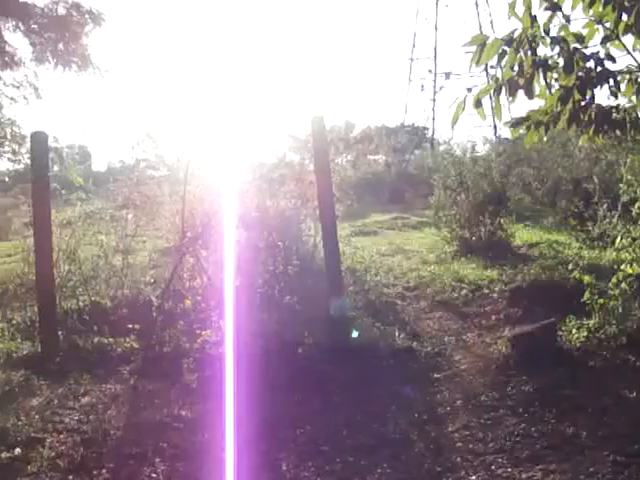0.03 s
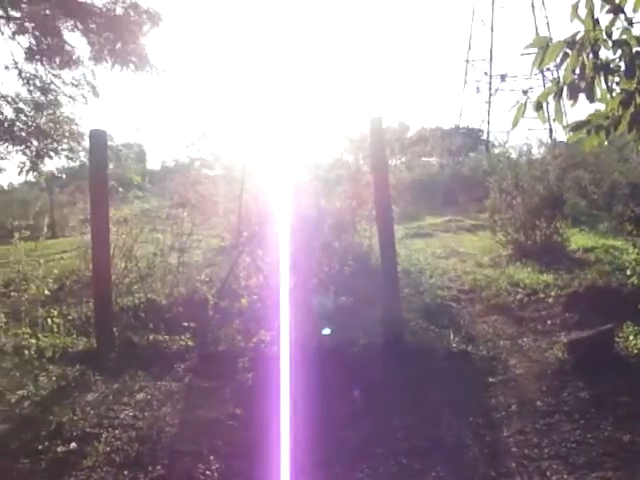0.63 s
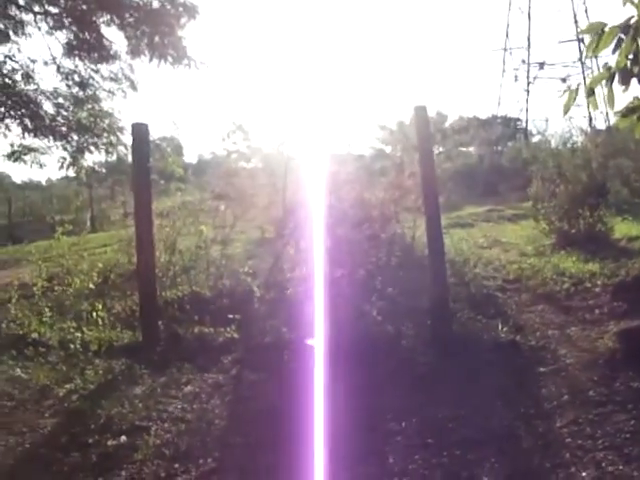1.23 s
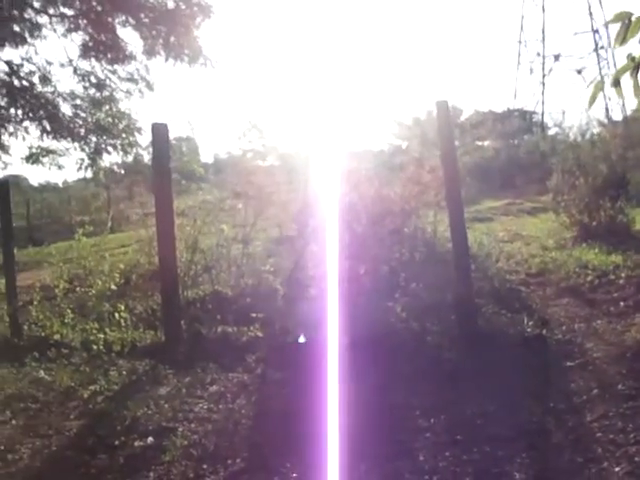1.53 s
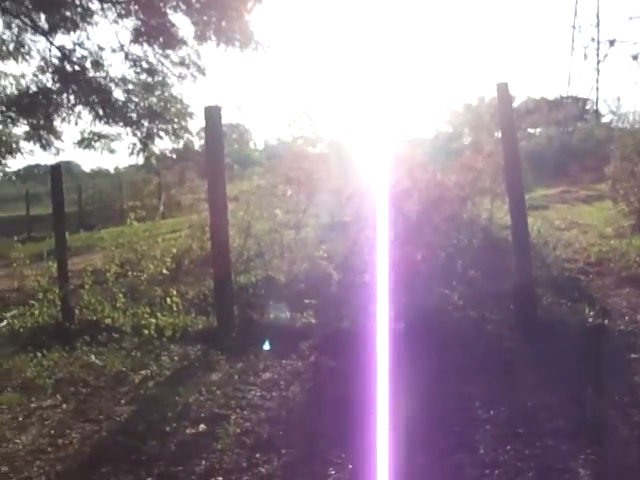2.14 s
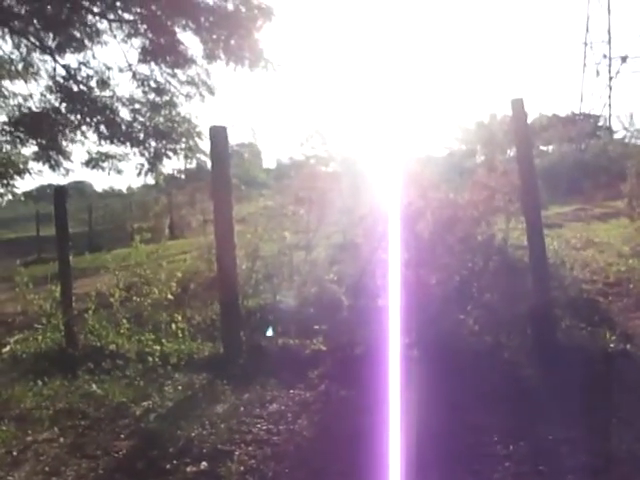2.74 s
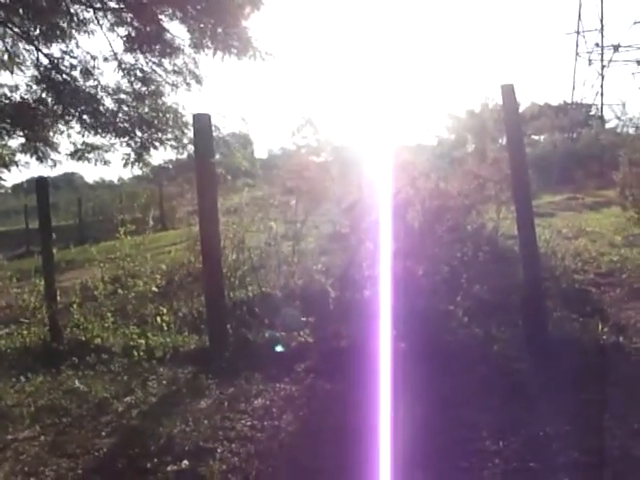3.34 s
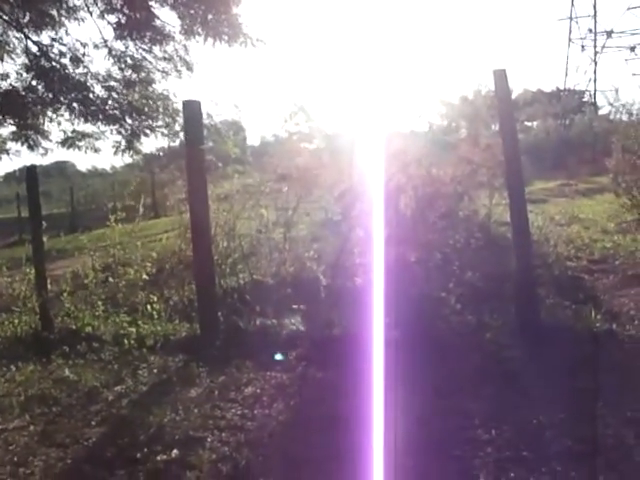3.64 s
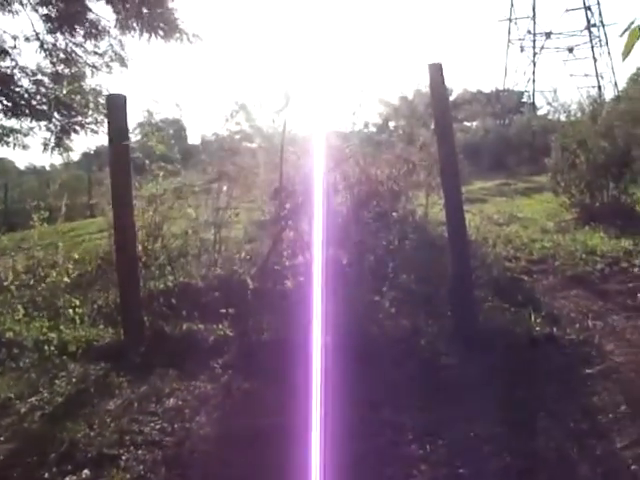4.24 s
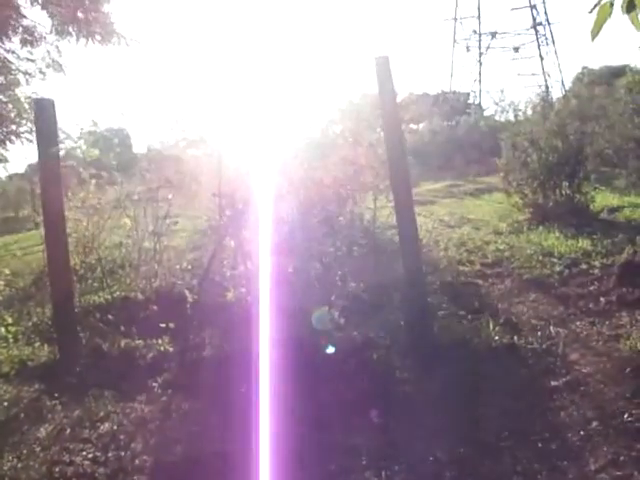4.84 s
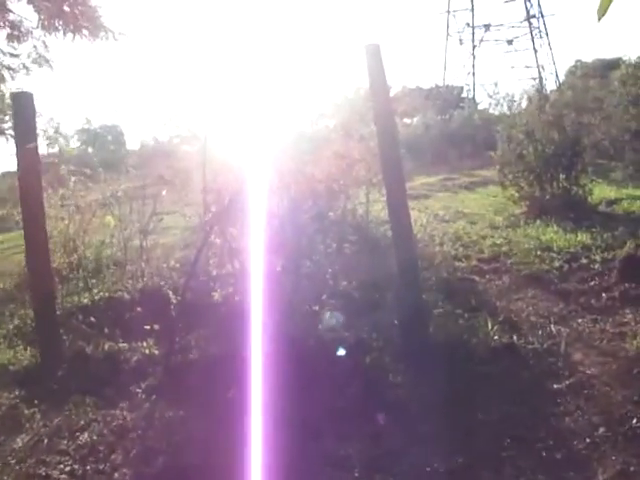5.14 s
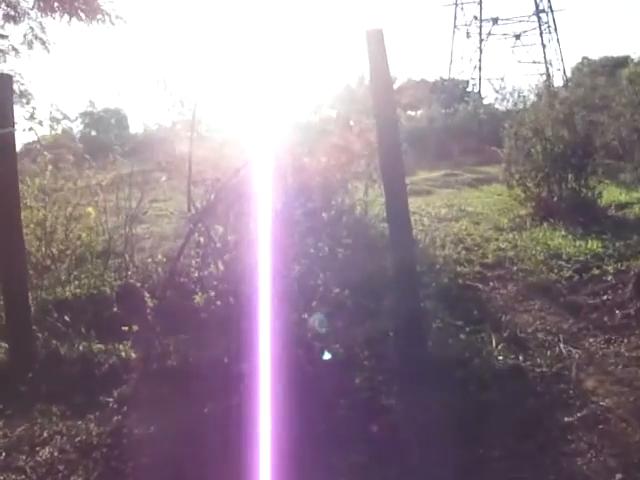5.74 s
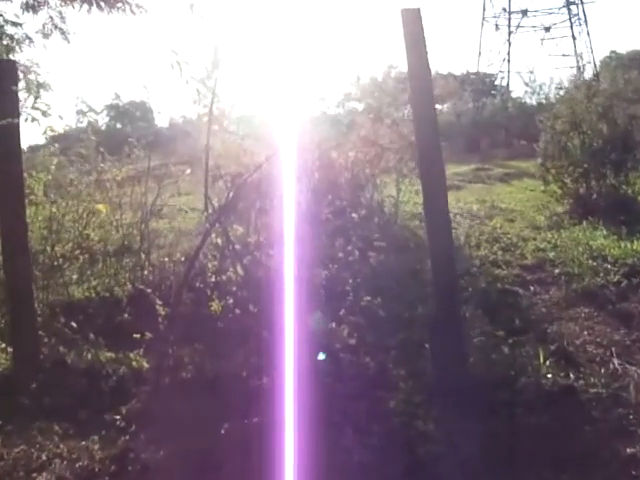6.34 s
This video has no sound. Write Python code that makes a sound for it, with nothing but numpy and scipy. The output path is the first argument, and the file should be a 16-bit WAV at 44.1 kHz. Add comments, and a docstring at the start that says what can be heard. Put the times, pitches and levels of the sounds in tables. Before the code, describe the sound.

A nearby calf lets out a short, raspy moo and, after a pause, a long one that drops in pitch at the end. The hand-held camera ticks twice along the way. A single soft bird whistle follows, then light rubbing, clicks and dull knocks right at the microphone and a few quick high chirps. Behind it all is the gentle hush of an open field with faraway birds.

```python
"""A soft outdoor hush and faint, distant twittering lie under an open pasture. Right away a calf bawls
close by, once short, then once long: slow, sharp pulses of its vocal folds ring its throat, and the bushes
throw back a short echo. A hand-held camera ticks twice along the way. As the long bawl dies, a bird gives
one arching whistle. Then fingers rub, click and bump on the camera's case, with a few quick chirps among
the last knocks."""
import sys
import numpy as np
from scipy import signal
from scipy.fft import rfft, irfft, next_fast_len
from scipy.io import wavfile
from scipy.ndimage import uniform_filter1d, map_coordinates

SR = 44100
rng = np.random.default_rng(int(sys.argv[2]) if len(sys.argv) > 2 else 0)


def wrap_up_sound(samples):
    """Save the sound to the file named by the first command line argument, as 16-bit audio."""
    columns = np.atleast_2d(samples).T
    # keep every value between -1 and 1, then stretch to whole-number steps
    tamed = np.clip(columns, -1, 1)
    steps = np.round(tamed * 32767).astype(np.int16)
    wavfile.write(sys.argv[1], SR, steps)


N = 290178

# Colour of the background hush. Each row: frequency in Hz, relative level in dB.
BACKGROUND_COLOUR = [(15, -65), (25, -35), (37, -27), (54, -8), (134, -6.5), (201, -6.5), (335, -7.5),
                     (411, -5.5), (587, -2), (757, 0), (817, -4.5), (1140, -3), (1890, -10.5), (2920, -15),
                     (11000, -29.5), (14200, -69), (22000, -120)]
# The background hush grows slightly louder after the long bawl.
# Each row: time in seconds, relative level in dB.
BACKGROUND_RISE = [(3.6, -48), (4.15, -46.5)]
# The two bawls. Each row: start, end and attack in seconds, blare and rasp levels in dB, blare and rasp
# sag in dB per second, release and pitch droop times in seconds, softness of the start from 0 to 1.
BAWLS = [(0.0609, 0.651, 0.00067, -20, -37.5, 5, 9.5, 0.036, .035, 0.04),
         (1.247, 3.23, 0.016, -21, -41, 0.77, 1.7, 0.02, .05, 1)]
# Held pitch of the short and the long bawl. Each row: time in seconds, pitch in Hz.
PITCH_SHORT = [(0.06, 125), (0.31, 120.5), (0.402, 118), (0.434, 116.8), (0.53, 116.5)]
PITCH_LONG = [(1.29, 106.5), (1.4, 106.7), (1.512, 109.6), (1.76, 113.2), (1.812, 111.2), (1.904, 113.4),
              (1.986, 112.5), (2.012, 113.9), (2.316, 118.4), (2.68, 117.1), (2.946, 115), (3.03, 113.5)]
# How unevenly the folds beat in mid-bawl. One value for each bawl, where 0 is clean.
HOARSE_HELD = [.24, .15]
# The calf's mouth. Each row: time in seconds, opening from 0 to 1.
MOUTH_OPENING = [(.05, 0.69), (.45, 0.67), (.64, 0.2), (1.25, 0), (2.38, 1), (3.22, 0.75)]
# Throat resonances of the short and the long bawl. Each row: nominal centre and width in Hz,
# relative level in dB with the mouth narrow, then with it wide.
THROAT_SHORT = [(708, 99, 0.5, -11), (1120, 1070, -18, -16), (1565, 220, -36, -6.5), (1695, 59, -1.5, 1.5),
                (2178, 174, 0.5, 4.5), (2555, 340, -10.5, 1), (2790, 130, -2.5, -7.5),
                (3520, 460, -11, -16.5), (4230, 190, -30, -12), (4950, 480, -13, -12.5),
                (5670, 190, -9.5, -35), (6220, 470, -18.5, -35), (9370, 1150, -34.5, -34.5)]
THROAT_LONG = [(692, 78, -2, 10), (1050, 260, -11, -19.5), (1600, 180, -70, -32), (1769, 214, -11, -8),
               (2015, 120, -49, -10.5), (2228, 275, 3, 1), (2580, 120, -9, -8.5), (2955, 158, -6, -10.5),
               (3400, 390, -9, -14.5), (4435, 400, -22, -17.5), (4810, 360, -46, -18.5),
               (5180, 108, -21, -16), (5720, 560, -32.5, -22.5), (6220, 290, -30, -21.5),
               (5300, 1000, -35, -53), (8740, 700, -59, -38), (9880, 730, -47, -35)]
# Fader ride on the voice's low boom. Each row: time in seconds, level in dB before the throb.
BOOM_RIDE = [(.06, -38), (.48, -37.5), (.57, -31.5), (.65, -42), (1.25, -42.5), (1.62, -30.5), (2.0, -33),
             (2.36, -30), (2.72, -25.5), (3.03, -28.5), (3.23, -34)]
# Colour of the calf's echo in the bushes. Each row: frequency in Hz, gain in dB.
ECHO_COLOUR = [(300, -14), (700, 0.5), (1700, 13), (2250, 2.5), (3000, 5), (6000, 11.5), (10000, 14)]
# Sharp ticks of the camera's case.
# Each row: start in seconds, relative peak in dB, ring pitch in Hz, crispness in dB.
CASE_TICKS = [(0.2252, -19, 5600, -16.5), (1.202, -23, 6750, -35), (4.18, -42, 7800, -18),
              (4.3017, -36.5, 7550, -25), (4.5835, -34.5, 6360, -9), (4.7122, -41, 6350, -23),
              (5.1902, -20, 8300, -14), (5.256, -37, 10100, -12), (5.2816, -37, 8140, -19),
              (5.3073, -37, 6500, -14), (6.127, -38.5, 8370, -16), (6.346, -40, 6670, -24)]
# Duller bumps of the hand. Each row: start in seconds, relative peak in dB, ring pitch in Hz.
HAND_BUMPS = [(5.186, -18, 1280), (5.202, -25, 1160), (5.37, -32, 775), (5.561, -22.5, 1094),
              (6.284, -27.5, 1100), (6.527, -25.5, 1224)]
# Modes of the bumped case.
# Each row: ratio to the ring pitch, relative level in dB, time to fall 60 dB in cycles of the ring pitch.
CASE_MODES = [(1.02, 11.5, 16.3), (1.45, 12.5, 9.2), (2.08, 1.5, 27.6), (0.79, 2, 20)]
# Fingers rubbing the case. Each row: centre and half length in seconds, level in dB.
FINGER_RUBS = [(4.18, .03, -48), (4.277, 0.063, -64), (5.118, .025, -52.5), (5.265, 0.061, -53),
               (6.126, 0.018, -54.5), (6.483, 0.028, -63)]
# Notes of the nearer birds. Each row: start and length in seconds, first, middle and last pitch in Hz,
# level at the accent in dB, place of the accent from 0 to 1, buzz depth in Hz.
BIRD_NOTES = [(3.205, .373, 4022, 4570, 3560, -46, .78, 8), (5.434, .07, 2070, 2850, 2820, -52, 0.33, 8),
              (5.606, .046, 6270, 5750, 4860, -44, 0.6, 8),
              (5.649, 0.066, 5000, 5160, 5600, -47.5, 0.2, 470),
              (5.819, 0.023, 5100, 5770, 5500, -47, 0.95, 8), (5.893, .011, 6300, 5750, 5200, -54, .6, 8),
              (5.913, 0.012, 6700, 5700, 4850, -41, 0.5, 8)]

SCOOP, SCOOP_S = .17, .018  # a soft start slides up from this share below the held pitch
SWELL_DB, RASP_SWELL_DB, SWELL_S = 7.5, 8, .16  # and swells from this far down
DROOP, RELEASE_DB, RASP_RELEASE_DB = .245, 9.5, 5.5  # as the air runs out, pitch (share) and level fall
HOARSE_START, HOARSE_START_S, HOARSE_END, HOARSE_END_S = .56, .35, 1.4, .075  # extra grit at either end


def amp(db):
    """Decibels to gain."""
    return 10 ** (np.asarray(db) / 20)


def unit(x):
    """Scale to rms 1."""
    return x / np.sqrt(np.mean(x ** 2) + 1e-20)


def clock():
    """The time of every sample, in seconds."""
    return np.arange(N) / SR


def ride(points):
    """A fader ride: straight lines through (seconds, value) points."""
    return np.interp(clock(), *np.transpose(points))


def gate(start, end, rise, fall):
    """1 from start to end, fading to 0 outside."""
    return np.clip(1 + np.minimum((clock() - start) / rise, (end - clock()) / fall), 0, 1)


def fading(elapsed, life):
    """1 until a moment has passed, then an exponential decay."""
    return np.exp(-np.maximum(elapsed, 0) / life)


def swell(centre, half_length):
    """A bell-shaped rise and fall."""
    return np.exp(-((clock() - centre) / half_length) ** 2 / 2)


def wobble(rate):
    """A smooth random curve, rate knots a second."""
    return map_coordinates(rng.standard_normal(int(N * rate / SR) + 4), [clock() * rate])


def filtered(x, response):
    """Filter x with a response given as a function of Hz."""
    size = next_fast_len(N + SR // 2)
    return irfft(rfft(x, size) * response(np.fft.rfftfreq(size, 1 / SR)), size)[:N]


def equalise(x, colour):
    """EQ through (Hz, dB) points on a log frequency axis."""
    points_hz, db = np.transpose(colour)
    return filtered(x, lambda hz: amp(np.interp(np.log(hz + 1), np.log(points_hz + 1), db)))


def noise(colour):
    """Noise of rms 1 with a given colour."""
    return unit(equalise(rng.standard_normal(N), colour))


def ring(x, gain, size=4096):
    """Minimum-phase filter with the given gain on an even frequency grid."""
    cepstrum = irfft(np.log(gain + 1e-6))
    cepstrum[1:size // 2] *= 2
    cepstrum[size // 2 + 1:] = 0
    return signal.oaconvolve(x, irfft(np.exp(rfft(cepstrum))))[:N]


def background():
    """The bed: a soft outdoor hush, with gently uneven leaves in the distance."""
    hush = noise(BACKGROUND_COLOUR)
    hush *= amp(ride(BACKGROUND_RISE) + 2.5 + .091 * wobble(1.6) + .7 * wobble(14))
    leaves = noise([(200, -45), (700, 2.5), (1200, -6), (2500, -9), (9000, -30)])
    return hush + leaves * amp(-49.5 + 1.4 * wobble(7.6))


def far_birds():
    """Distant twittering: thin wandering notes that come and go."""
    hz = 3600 + 220 * wobble(7) + 50 * wobble(60)
    notes = np.clip(wobble(8.2), 0, 1)
    return amp(-60) * notes * np.sin(2 * np.pi * np.cumsum(hz) / SR)


def vocal_folds(start, pitch, hoarse, jitter_s=.000025, shimmer_db=1.1, breath=.4, puff_cycles=.4):
    """One sharp closure per cycle, then a puff of turbulence; hoarseness scales jitter and shimmer."""
    cycles = np.cumsum(pitch) / SR
    cycles -= cycles[round(start * SR)] % 1  # the bawl begins with a closure
    closures = np.interp(np.arange(1, int(cycles[-1])), cycles, np.arange(N))
    uneven = rng.standard_normal((len(closures), 2)) * hoarse[closures.astype(int), None]
    closures += jitter_s * SR * uneven[:, 0]
    taps = closures.astype(int)[:, None] + np.arange(-8, 9)
    offset = taps - closures[:, None]
    clicks = np.sinc(offset) * np.sinc(offset / 9) * amp(shimmer_db * uneven[:, 1:])
    pulses = np.bincount(np.clip(taps, 0, N - 1).ravel(), clicks.ravel(), N)
    # the folds close like a zip: the low part of each pulse lags a little
    pulses = filtered(pulses, lambda hz: np.exp(-6j * np.arctan(hz / 2200)))
    hiss = noise([(700, -22), (2300, -20), (3200, -8), (4500, 0), (9000, 7)])
    puffs = unit(hiss * np.exp(-(cycles % 1) / puff_cycles))
    return unit(pulses) + breath * (1 + 3 * hoarse) * puffs


def throat(source, resonances, skirt=1.617, stretch=.018):
    """Pulses ring the throat; as the mouth opens its resonances rise a little and shift in strength."""
    hz = np.fft.rfftfreq(4096, 1 / SR)
    centre, width, narrow_db, wide_db = np.transpose(resonances)[:, :, None]
    low_cut = 1 - 1 / (1 + (hz / 470) ** 8)
    chest = amp(-29) ** 2 / (1 + ((hz - 235) / 45) ** 4)

    def vowel(db, shift, damping):
        detuning = (hz - centre * (1 + shift)) / (damping * width / 2)
        power = np.sum(amp(db) ** 2 * (1 + detuning ** 2) ** -skirt, axis=0)
        return ring(source, np.sqrt(power * low_cut + chest))

    # a narrow mouth lets less sound out, so the throat rings longer
    narrow = vowel(narrow_db, -stretch, damping=.7)
    wide = vowel(wide_db, stretch / 2, damping=.96)
    opening = ride(MOUTH_OPENING)
    return (1 - opening) * narrow + opening * wide


def levelled(x):
    """Iron out the swings in loudness, holding the rms near 1."""
    power = uniform_filter1d(uniform_filter1d(x ** 2, size=2200), size=2200)
    return x / np.sqrt(np.abs(power) + 1e-9)


def registers(voice, boom_db, blare_db, rasp_db):
    """The low boom, the nasal blare and the top rasp of the voice, each on its own fader."""
    boom = filtered(voice, lambda hz: 1 / (1 + (hz / 950) ** 12))
    rasp = filtered(voice, lambda hz: 1 - 1 / (1 + (hz / 4050) ** 24))
    blare = voice - boom - rasp
    return amp(boom_db) * levelled(boom) + amp(blare_db) * levelled(blare) + amp(rasp_db) * levelled(rasp)


def bawl(row, held_pitch, hoarse_held, resonances):
    """The calf scoops up and swells, holds with a slight sag, then droops, hoarse, as the air runs out."""
    start, end, attack, blare_db, rasp_db, blare_sag, rasp_sag, release, droop_s, soft = row
    age, left = np.clip(clock(), start, end) - start, end - clock()
    pitch = ride(held_pitch) * (1 - soft * SCOOP * fading(age, SCOOP_S))
    pitch *= 1 - DROOP * fading(left, droop_s)
    hoarse = hoarse_held + soft * HOARSE_START * fading(age, HOARSE_START_S)
    hoarse += HOARSE_END * fading(left, HOARSE_END_S)
    voice = throat(vocal_folds(start, pitch, hoarse), resonances)
    starting, ending = soft * fading(age, SWELL_S), fading(left, release)
    voice = registers(voice, ride(BOOM_RIDE) + throb(),
                      blare_db - blare_sag * age - SWELL_DB * starting - RELEASE_DB * ending,
                      rasp_db - rasp_sag * age - RASP_SWELL_DB * starting - RASP_RELEASE_DB * ending)
    onset = 1 - fading(age + attack / 2, attack)
    return -voice * onset * gate(start, end, rise=.003, fall=.016)


def ground_bounce(x, delay_s=.0022, sway_s=.00003):
    """A weak reflection whose path drifts as the calf and the camera move."""
    lag = delay_s + sway_s * wobble(4)
    return amp(-21) * map_coordinates(x, [(clock() - lag) * SR], order=3)


def bushes(x, t60, delay_s, dull_hz=20000):
    """Scattered echo from hedges and trees; the treble dies first."""
    hz, t, scatter = signal.stft(rng.standard_normal(SR // 2), SR, nperseg=256)
    decay = amp(-60 * t * (1 + hz[:, None] / dull_hz) / t60)
    tail = signal.istft(scatter * decay, SR, nperseg=256)[1]
    return signal.fftconvolve(np.pad(x, (int(delay_s * SR), 0)), tail / np.linalg.norm(tail))[:N]


def case_tick(t, hz, crisp_db):
    """The camera's case ticks: a bright crack over a tiny ping."""
    band = signal.butter(2, [5500, 11000], "band", fs=SR, output="sos")
    crack = signal.sosfilt(band, rng.standard_normal(len(t))) * amp(-60 * t / .0077)
    ping = np.sin(2 * np.pi * hz * t) * amp(-60 * t / .005)
    return (amp(crisp_db + 9) * crack + .5 * ping) * (1 - np.exp(-t / .00014))


def hits(sound, rows, trim_db):
    """Lay one short hit per row on the timeline, peaking at the row's level plus the trim."""
    track, t = np.zeros(N + SR), np.arange(SR // 10) / SR
    for start, db, *tone in rows:
        hit = sound(t, *tone)
        track[round(start * SR):][:len(t)] += amp(db + trim_db) * hit / np.abs(hit).max()
    return track[:N]


def throb(centre_s=1.656, spread_s=.44, period_s=.207, depth_db=3.5):
    """Early in the long bawl the boom swells and ebbs a few times, then settles; a ride in dB."""
    t = clock() - centre_s
    return depth_db * np.cos(2 * np.pi * t / period_s) * np.exp(-(t / spread_s) ** 2)


def whistle(start, length, first_hz, middle_hz, last_hz, db, accent, buzz_depth_hz):
    """One pure bird note on an arch of pitch, with one accent; a fast sweep of its pitch makes it buzz."""
    flatness, accent_db, accent_width, buzz_rate_hz = 2.3, 12, .18, 124
    progress = np.clip((clock() - start) / length, 0, 1)
    arch = 1 - np.abs(2 * progress - 1) ** flatness
    hz = first_hz + (last_hz - first_hz) * progress + (middle_hz - (first_hz + last_hz) / 2) * arch
    hz += buzz_depth_hz * np.sin(2 * np.pi * buzz_rate_hz * clock())
    level = amp(db - accent_db * (1 - np.exp(-((progress - accent) / accent_width) ** 2)))
    level *= gate(start, start + length, rise=.003, fall=.0024)
    return np.sqrt(2) * level * np.sin(2 * np.pi * np.cumsum(hz) / SR)


def near_birds():
    """A long arching whistle, then a few quick, slightly scratchy chirps and a trill."""
    scratch = amp(1.6 * wobble(300))
    return sum(whistle(*note) for note in BIRD_NOTES) * scratch


def finger_rubs():
    """Fingers drag over the case in tiny slips."""
    pressure = sum(amp(db) * swell(centre, half_length) for centre, half_length, db in FINGER_RUBS)
    friction = noise([(1000, -23), (4000, -3), (8000, -4), (11000, -11)])
    return pressure * unit(friction * amp(7.6 * wobble(500)))


def palm_thud():
    """The palm settles on the case with a soft thud."""
    body = noise([(200, -33), (550, 0), (750, 0), (1500, -18), (5000, -53)])
    return amp(-40.5) * body * swell(centre=5.134, half_length=.0064)


def hand_bump(t, hz):
    """The hand knocks the case: its modes ring briefly under a scuff of noise."""
    knock = sum(amp(db - 60 * t * hz / cycles) * np.sin(2 * np.pi * hz * ratio * t)
                for ratio, db, cycles in CASE_MODES)
    scuff = .66 * rng.standard_normal(len(t)) * amp(-60 * t / .013)
    return (knock + scuff) * (1 - np.exp(-t / .0011))


def scene():
    """The mono mix: calf and birds with their echoes, the hand on the camera, and the hush."""
    calf = sum(bawl(*call) for call in
               zip(BAWLS, [PITCH_SHORT, PITCH_LONG], HOARSE_HELD, [THROAT_SHORT, THROAT_LONG]))
    ground = ground_bounce(calf)
    echo = equalise(amp(-15) * bushes(calf, t60=.43, delay_s=.008), ECHO_COLOUR)
    song = near_birds() + far_birds()
    song += amp(-8) * bushes(song, t60=.33, delay_s=.01)
    handling = hits(case_tick, CASE_TICKS, trim_db=.5) + hits(hand_bump, HAND_BUMPS, trim_db=-1.5)
    handling += finger_rubs() + palm_thud()
    return (calf + ground + echo + song + handling + background())[None]


def record(dry):
    """The sound cuts in after a moment of silence, with a brick-wall cut on the top end."""
    start_s, top_hz = .055, 11050
    return filtered(dry[0] * (clock() > start_s), lambda hz: hz < top_hz)[None]


dry = scene()
out = record(dry)
wrap_up_sound(out)
```